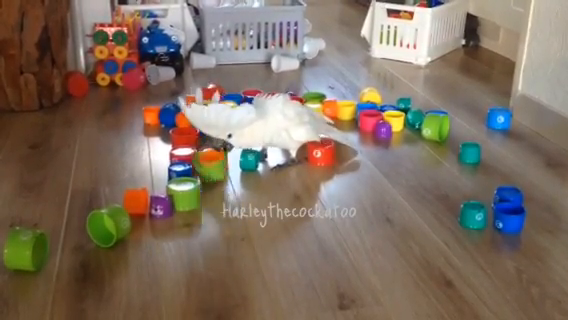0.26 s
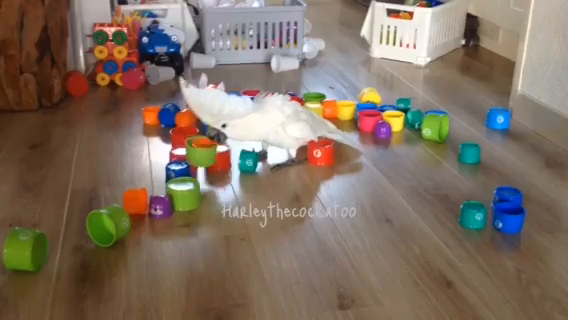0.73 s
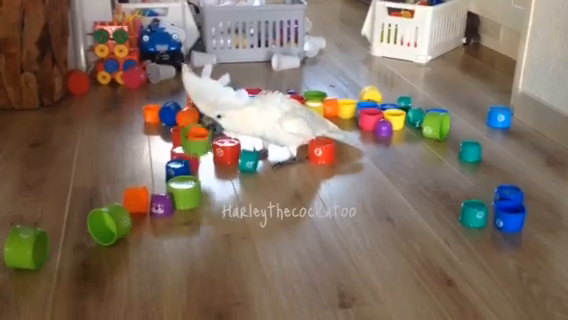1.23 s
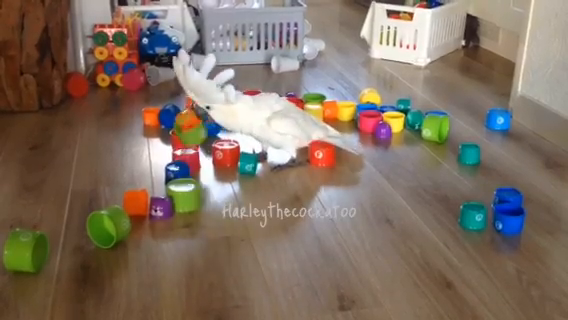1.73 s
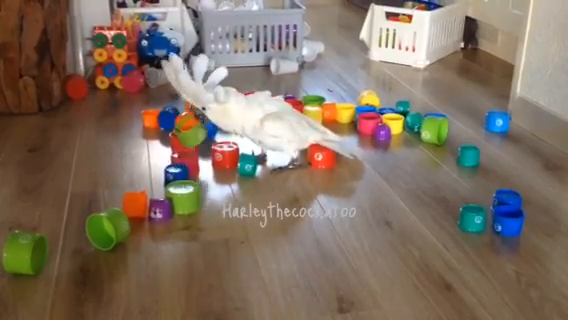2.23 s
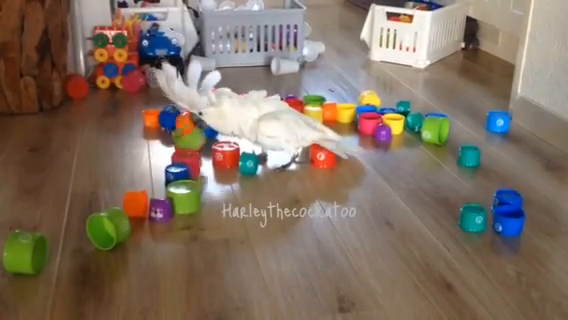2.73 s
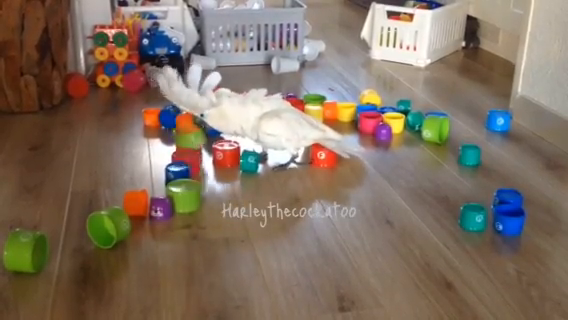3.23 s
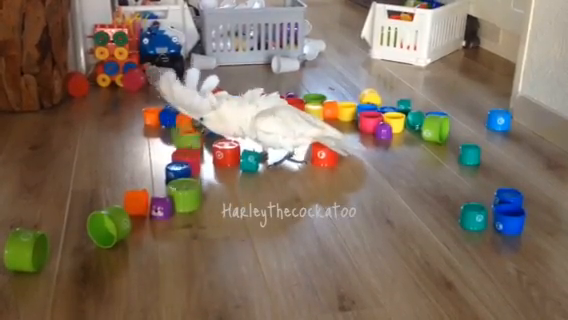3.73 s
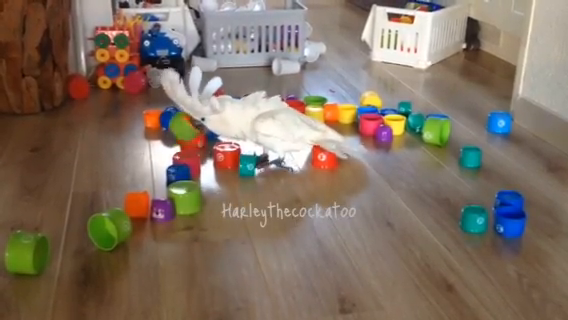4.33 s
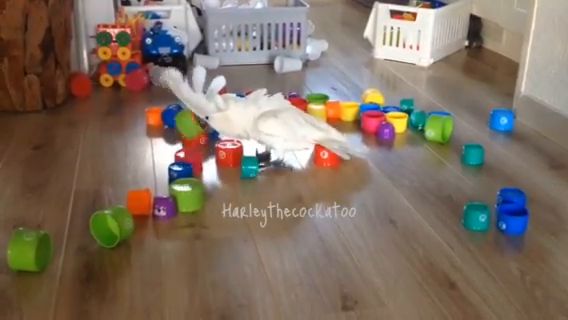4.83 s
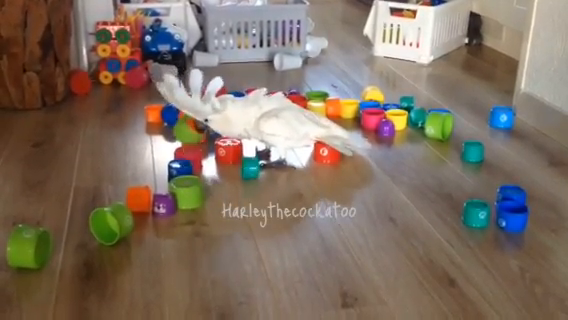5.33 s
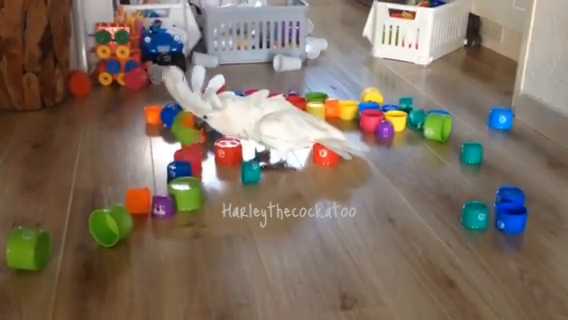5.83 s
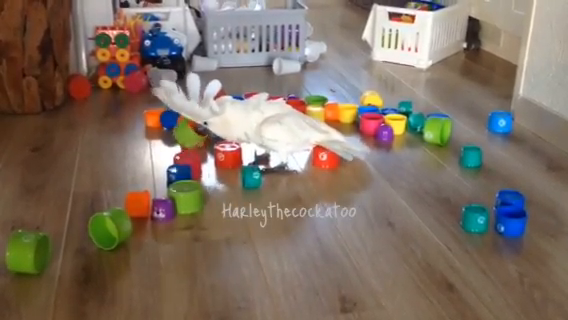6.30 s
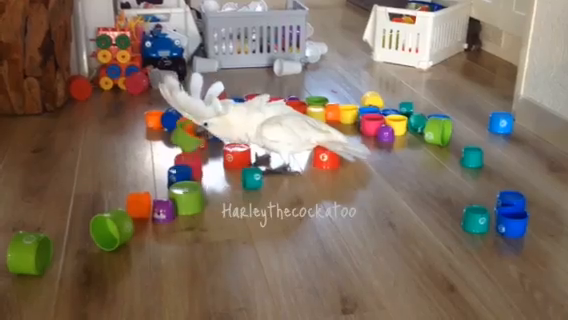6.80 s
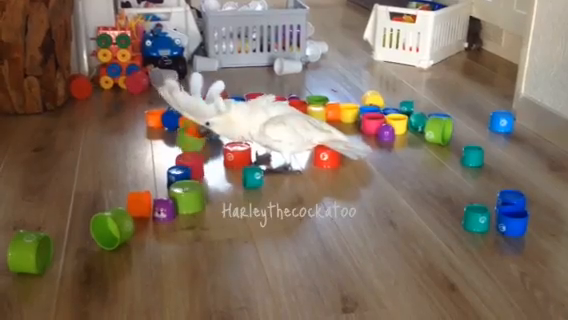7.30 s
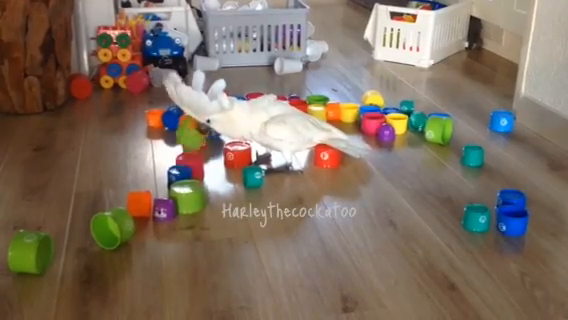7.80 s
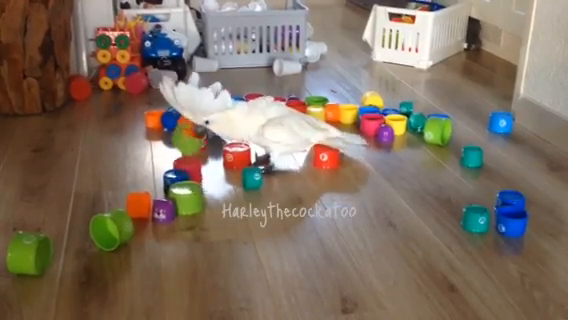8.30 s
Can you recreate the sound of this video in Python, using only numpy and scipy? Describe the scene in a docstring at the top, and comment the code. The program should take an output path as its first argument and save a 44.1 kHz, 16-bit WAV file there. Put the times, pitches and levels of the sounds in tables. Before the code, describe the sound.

Room ringing from an earlier blow opens the scene, then hard plastic knocks continue throughout, some bright and clicky, others duller and woody. Pauses of about half a second break the loose rhythm early on; later blows come more steadily, with more small ticks. The bare living room adds wall reflections and a short decaying tail, heard from a modest distance over very quiet air noise.

```python
"""Hard plastic raps are heard first: a cockatoo strikes a cup held in its beak on other cups and a hard floor.
The blows come up to about four a second; each is a chatter of contacts, filtered by cup and board resonances.
The part of the cup that lands shifts the ring. Light ticks and soft footfalls come in between.
A bare living room answers every blow with wall echoes and a decaying noise tail, over faint steady air noise."""
import sys
import numpy as np
from scipy import signal
from scipy.fft import rfft, irfft, next_fast_len
from scipy.io import wavfile
from scipy.ndimage import uniform_filter1d, minimum_filter1d, map_coordinates

SR = 44100
rng = np.random.default_rng(int(sys.argv[2]) if len(sys.argv) > 2 else 0)


def to_wav(s):
    """Save 16-bit WAV."""
    ch = np.atleast_2d(s).T  # columns
    pcm = np.round(np.clip(ch, -1, 1) * 32767)  # PCM
    wavfile.write(sys.argv[1], SR, pcm.astype(np.int16))


N = 377055
FFT_SIZE = 49152
HZ = np.fft.rfftfreq(FFT_SIZE, 1 / SR)
T = np.arange(SR) / SR

# Full blows of the cup. Each row: start in seconds, level in dB, knock of the boards in dB, brightness in dB,
# ring at the point of contact in Hz, its gain in dB, part of the cup that lands.
BLOWS = [(0.317, 21.5, 2.5, 1, 1434, 10.5, "mouth"), (0.5326, 21.5, 0, 2, 920, 5, "mouth"),
         (0.7844, 24, -7.5, -6.5, 1060, 11.5, "mouth"), (1.0447, 21.5, 1.5, 1, 844, -1, "mouth"),
         (1.2914, 23.5, 3, -2, 876, 7, "base"), (1.5608, 19, 4.5, 1.5, 440, 2.5, "corner"),
         (1.8126, 20, 3, 1, 2820, 3, "corner"), (2.0523, 14, 10.5, 3.5, 846, 4.5, "corner"),
         (2.5454, 22, -4.5, 4.5, 1980, 5, "rim"), (2.79, 10.5, 0, -3, 1380, 7.5, "corner"),
         (3.0163, 20, 4, 4, 810, 6.5, "rim"), (3.4997, 21, 3, 3.5, 840, 3.5, "rim"),
         (4.0127, 17.5, 1, -3.5, 590, 10, "wall"), (4.2344, 17.5, 2, 0.5, 2330, 6.5, "rim"),
         (4.7385, 22, 3.5, 1.5, 815, 5.5, "wall"), (5.2115, 22.5, 1, 0.5, 920, 5, "wall"),
         (5.452, 24.5, 1, -3.5, 3160, 4, "base"), (5.6486, 13, 1, -5.5, 1252, 5, "wall"),
         (5.6975, 22.5, 2, -5, 880, 6, "base"), (6.18, 25, 3, -3.5, 3870, 0, "base"),
         (6.4397, 18.5, 11.5, 2.5, 1030, 10.5, "wall"), (6.6913, 14, 5, -1.5, 1420, 2, "wall"),
         (6.921, 22, 7, -1.5, 1000, 9, "base"), (7.1286, 16.5, 7, 2.5, 900, 2, "corner"),
         (7.4094, 25, 2.5, -6, 4740, 3.5, "base"), (7.6714, 11, 10, 1.5, 920, 7, "wall"),
         (7.866, 9.5, 12.5, 2.5, 1250, 11.5, "corner"), (8.1547, 17, 10, 3.5, 1060, 5.5, "corner"),
         (8.364, 15.5, 1.5, -1.5, 900, 6, "corner")]
# Light touches of beak and cup rim. Each row: start in seconds, level in dB, brightness in dB.
LIGHT_TOUCHES = [(0.7818, 18, 10), (2.5413, 14.5, 11), (4.1921, 3, -2), (5.9493, 4.5, 2.5),
                 (6.7905, 11.5, -2), (6.8758, 7, -3), (7.196, 15, -4), (7.886, 18, -3), (8.0996, 9, -4.5),
                 (8.2728, 12.5, 1.5), (8.359, 16, 0.5), (8.4744, 11.5, 2)]
# Soft footfalls on the boards. Each row: start in seconds, level in dB.
FOOTFALLS = [(2.277, -8), (2.354, 4), (2.38, -8)]
# The part of the cup that lands. Each entry: floor thud in dB, sharp edge in dB, then the resonances
# that it alters, each as frequency in Hz, gain in dB.
LANDING_PARTS = {"mouth": (2.9, 0.68, [(393, 14.5), (855, 8), (1680, 7.5)]), "wall": (0.83, 0.84, [(810, 2),
                 (1530, 9.5), (1870, 6)]), "corner": (1, -3, [(630, -0.5), (1210, 6.5)]),
                 "rim": (-8, -1.2, [(2100, 4), (2850, 2), (4800, 2)]), "base": (-1, 2.7, [(505, 3.5),
                 (3200, 3), (4350, 2.5)])}
# Broad colour of plastic on a hard floor. Each row: frequency in Hz, gain in dB.
PLASTIC_COLOUR = [(60, -54), (110, -40), (200, -14), (330, -10), (450, -0.55), (700, -5), (1000, -3.5),
                  (2000, -6.5), (3300, -5.5), (4850, -8.5), (5250, -12.5), (8500, -14.5), (12000, -22.5),
                  (15000, -27)]
# Resonances of cup and boards shared by every plastic contact. Each row: frequency in Hz, width in Hz, rise in dB.
SHARED_MODES = [(251, 26, 4), (337, 17, 7), (520, 370, 2), (592, 35, 2), (835.3, 34, 4.5), (912, 8.4, 5),
                (1065, 45, 5), (1240, 24, 6), (1330, 51, 4), (1414, 38, 2), (1580, 39, 0.5), (1950, 130, 3),
                (2640, 300, 2.5), (4100, 370, 3), (4550, 290, 4)]
# How far the weaker shell modes stand out. Each row: frequency in Hz, spread in dB.
LESSER_MODE_SPREAD = [(450, 1.45), (1000, 1.5), (4500, 2.5), (7000, 2)]
# Centres in Hz of the floor's thud, the boards' knock, the cup's body, its clack and its edge, in that order.
TONE_CENTRES = (230, 480, 1100, 3200, 10000)
# Short hollow knock of the board under the cup. One row: frequency in Hz, width in Hz, rise in dB.
BOARD_MODE = (493, 88, 5.7)
# A padded foot. Each row: frequency in Hz, gain in dB.
FOOT_COLOUR = [(40, -32), (110, -10), (180, -6), (300, -3.5), (500, -15), (1000, -36), (4000, -46)]
# The direct sound weakens as the cup goes behind the bird and the other cups.
# Each row: time in seconds, level in dB.
DIRECT_LEVEL = [(0.3, -3.5), (1, -5), (3.5, -5), (6.5, -6.5), (8.4, -7.5)]
# The ceiling returns the low thud. One row: delay in seconds, level in dB, top frequency in Hz.
CEILING_ECHO = (0.01233, -2.5, 210)
# Narrow resonances and dips in the room's answer. Each row: frequency in Hz, width in Hz, gain in dB.
ROOM_RESONANCES = [(380, 11, -4), (622.5, 7.6, 5.5), (831, 12, 1.5), (1058, 21, -8), (1255, 8.7, -8.5),
                   (1410, 12, 2.5), (1574, 12, 7)]
# Decay of the room's late tail. Each row: frequency in Hz, time to fall 60 dB in seconds.
ROOM_DECAY = [(150, 1), (400, 0.65), (850, 0.79), (1500, 0.77), (2800, 0.79), (5000, 0.69), (8000, 0.55),
              (14000, 0.33)]
# Colour of the room's answer against the direct sound. Each row: frequency in Hz, gain in dB.
ROOM_COLOUR = [(60, 16), (200, -6), (330, -5.5), (480, -7.5), (700, -1.5), (1000, 2), (4000, -1.5),
               (8000, -2.5), (13000, -3.5)]
# Colour of the quiet room air. Each row: frequency in Hz, relative density in dB per Hz.
AIR_COLOUR = [(30, -33), (100, -5.5), (200, 5.5), (500, -12), (1500, 5), (4500, -8), (6000, -12),
              (15000, -18)]

LEAD_S = .002  # graze ahead of the landing, seconds
EARLIER_S = -0.21  # start of a blow just before time zero, seconds
RING_WIDTH = 0.12  # width of a ring over its frequency
USUAL_DB = 17.5  # level of an ordinary blow
THUD_LOSS = 0.78  # dB of thud lost per dB of force: a harder blow is a shorter contact
THUD_PER_KNOCK = 0.25  # dB of thud gained per dB of knock
TOP_HZ = 15400  # upper band limit


def pecking():
    """Superposition: the blows add, and one before time zero leaves the room already ringing."""
    track = np.zeros(N)
    earlier_blow = (EARLIER_S, *BLOWS[0][1:])
    for s, *stroke in [earlier_blow, *BLOWS]:
        add(track, s, peck(s, *stroke))
    return track


def peck(s, db, knock_db, bright_db, ring_hz, ring_db, part):
    """Modal excitation: landing part and contact point pick the resonances; softer blows thud more."""
    part_thud_db, edge_db, rings = LANDING_PARTS[part]
    thud_db = part_thud_db + THUD_PER_KNOCK * knock_db - THUD_LOSS * (db - USUAL_DB)
    tone_db = (thud_db, knock_db, 0, bright_db, bright_db + edge_db)
    tone = along(list(zip(TONE_CENTRES, tone_db)), HZ)
    all_rings = [*rings, (ring_hz, ring_db)]
    ringing = sum(bump(hz, RING_WIDTH * hz, gain_db) for hz, gain_db in all_rings)
    direct_db = np.interp(s, *np.transpose(DIRECT_LEVEL))
    return blow(db + plastic() + tone + ringing, direct_db=direct_db, room_db=-0.9)


def ticking():
    """Weak excitation: light touches sound the same plastic with their own tilt of the spectrum."""
    track = np.zeros(N)
    for s, db, bright_db in LIGHT_TOUCHES:
        tilt = along([(300, 4.6), (1100, 2), (5000, bright_db)], HZ)
        add(track, s, blow(db + plastic() + tilt, direct_db=-12.0, room_db=-5.5))
    return track


def footfalls():
    """Soft contact: a padded foot passes little treble, and these dull pats hardly stir the room."""
    track = np.zeros(N)
    for s, db in FOOTFALLS:
        add(track, s, blow(db + along(FOOT_COLOUR, HZ), direct_db=0.0, room_db=-14))
    return track


def blow(colour_db, direct_db, room_db):
    """Source and path: one contact is coloured by what it strikes and heard both directly and via the room."""
    direct = contact(chatter_s=0.0019, spikiness=0.92, first_share=0.55, evenness=0.3, graze_db=-15)
    direct *= causal(bump(*BOARD_MODE))
    direct *= echo(*CEILING_ECHO)
    answer = room(early_db=-8.5, early_t60=0.29, wall_db=-18, delay_s=0.0035)
    answer *= causal(sum(bump(*resonance) for resonance in ROOM_RESONANCES))
    answer *= np.exp(-2j * np.pi * HZ * LEAD_S)  # the room answers the landing
    heard = amp(direct_db) * direct + amp(room_db) * answer
    return irfft(causal(colour_db) * heard)[:SR]


def contact(chatter_s, spikiness, first_share, evenness, graze_db):
    """Impulsive excitation: a graze, a sharp landing, then random slaps for a few milliseconds."""
    slaps = rng.standard_normal(SR) * np.exp(spikiness * rng.standard_normal(SR))
    age = np.maximum(T - LEAD_S, 0) / chatter_s
    graze = amp(graze_db) * T / LEAD_S * (T < LEAD_S)
    chatter = slaps * (graze + age ** .5 * np.exp(-age))
    chatter /= np.linalg.norm(chatter)
    landing = np.exp(-2j * np.pi * HZ * (LEAD_S + 0.000743))
    spectrum = rfft(chatter, FFT_SIZE) + first_share * landing
    # so short a push reaches all low frequencies alike
    even = along([(600, 0.88), (1500, evenness)], HZ)
    spectrum /= (np.abs(spectrum) + 1e-3) ** even
    return spectrum / np.sqrt(np.mean(np.abs(spectrum) ** 2))


def plastic():
    """Modal response: the struck plastic's broad colour carries shared and lesser resonances, in dB."""
    shared = sum(bump(hz, width, db) for hz, width, db in SHARED_MODES)
    return along(PLASTIC_COLOUR, HZ) + shared + lesser_modes()


def lesser_modes():
    """Mode participation: each contact favours its own random set of weaker shell modes, in dB."""
    per_octave = 24
    place = per_octave * np.log2(1 + HZ / 500)
    heights = rng.standard_normal(int(place[-1]) + 4)
    return along(LESSER_MODE_SPREAD, HZ) * map_coordinates(heights, [place])


def echo(delay_s, db, top_hz):
    """Reflection: a delayed copy, dulled above its top frequency, joins the straight path."""
    dulling = 1 + (HZ / top_hz) ** 4
    return 1 + amp(db) * np.exp(-2j * np.pi * HZ * delay_s) / dulling


def room(early_db, early_t60, wall_db, delay_s):
    """Reverberation: near-wall echoes, a quick early scatter and a tail that dies by frequency."""
    hz, t, grains = signal.stft(rng.standard_normal(SR), SR, nperseg=256)
    late = amp(-60 * t / along(ROOM_DECAY, hz)[:, None])
    early = amp(early_db - 60 * t / early_t60)
    fade = np.hypot(late, early)
    fade /= np.sqrt(np.sum(fade ** 2, axis=1, keepdims=True))  # equal energy in each band
    tail = signal.istft(grains * fade, SR, nperseg=256)[1][:SR]
    tail *= 1 - np.exp(-(T / delay_s) ** 2)  # gradual onset
    tail /= np.linalg.norm(tail)
    walls = (rng.uniform(0.012, .045, size=6) * SR).astype(int)
    tail[walls] += amp(wall_db) * rng.uniform(0.17, 1, size=6)
    return rfft(tail, FFT_SIZE) * amp(along(ROOM_COLOUR, HZ))


def air(level_db):
    """Stationary noise: filtered random pressure gives the faint steady air of the room."""
    colour = amp(along(AIR_COLOUR, np.fft.rfftfreq(N, 1 / SR)))
    noise = irfft(rfft(rng.standard_normal(N)) * colour, N)
    return amp(level_db) * noise / noise.std()


def amp(db):
    """Level law: 20 dB is a factor of ten in amplitude."""
    return 10 ** (np.asarray(db) / 20)


def along(points, hz):
    """Logarithmic frequency scale: values between points are read in proportion to log frequency."""
    f, v = np.transpose(points)
    return np.interp(np.log(hz + 1), np.log(f + 1), v)


def bump(hz, width, db):
    """Resonance: a bell-shaped rise, or dip if negative, in dB around one frequency."""
    return db / (1 + ((HZ - hz) / (width / 2)) ** 2)


def causal(db):
    """Causality: the minimum-phase response with this gain rings only after it is struck."""
    cepstrum = irfft(np.log(np.maximum(amp(db), 1e-6)))
    cepstrum[1:FFT_SIZE // 2] *= 2
    cepstrum[FFT_SIZE // 2 + 1:] = 0
    return np.exp(rfft(cepstrum))


def add(track, s, sound):
    """Superposition: a sound joins the track LEAD_S ahead of time s, trimmed to the track's ends."""
    start = round((s - LEAD_S) * SR)
    part = sound[max(-start, 0):N - start]
    track[max(start, 0):][:len(part)] += part


def scene():
    """Summation at one microphone: bird, cups, feet and room air add as pressures."""
    return (pecking() + ticking() + footfalls() + air(level_db=-64))[None]


def record(dry):
    """Limiting and band-limiting: fast gain reduction holds peaks, then filters trim treble and deep bass."""
    ceiling, hold = .7, round(.0015 * SR)  # peak amplitude, samples
    needed = ceiling / np.maximum(np.abs(dry), ceiling)
    gain = uniform_filter1d(minimum_filter1d(needed, 2 * hold), hold)
    held = dry * gain
    size = next_fast_len(N + SR // 2)
    hz = np.fft.rfftfreq(size, 1 / SR)
    treble_cut = 1 / np.sqrt(1 + (hz / TOP_HZ) ** 200)
    bass_hz = 90  # the small microphone weakens the deep bass, by up to half
    bass_cut = (1j * hz + bass_hz / 2) / (1j * hz + bass_hz)
    return irfft(rfft(held, size) * treble_cut * bass_cut, size)[:, :N]


dry = scene()
out = record(dry)
to_wav(out)
```